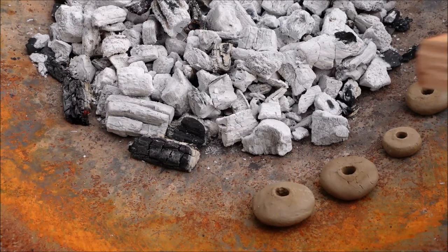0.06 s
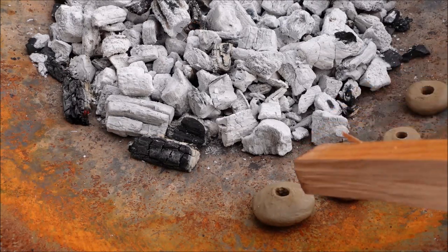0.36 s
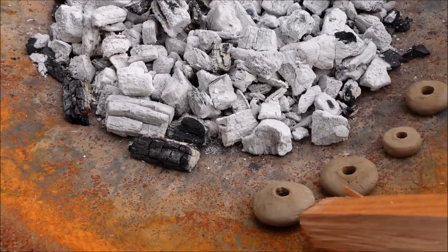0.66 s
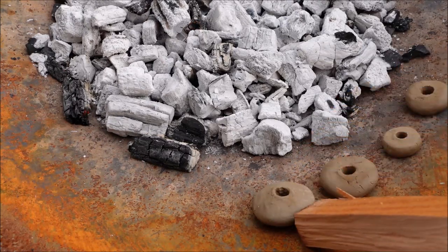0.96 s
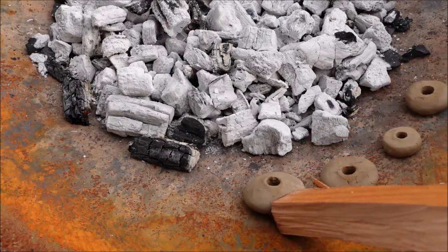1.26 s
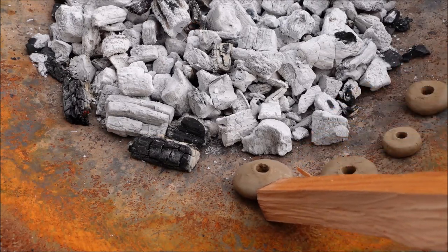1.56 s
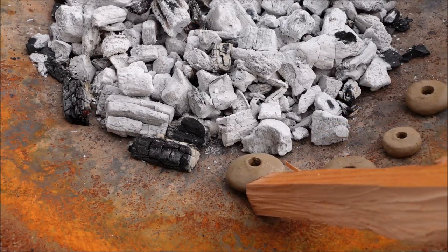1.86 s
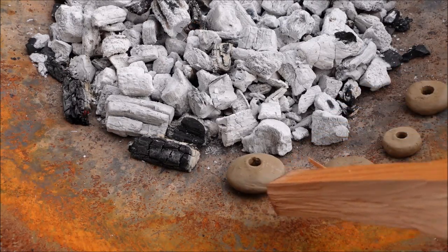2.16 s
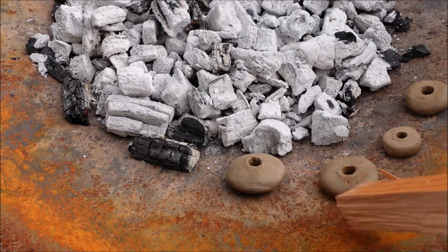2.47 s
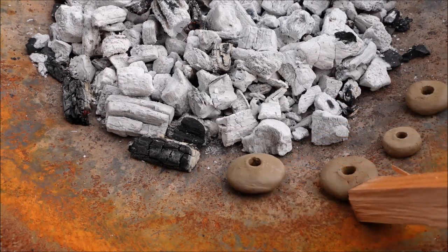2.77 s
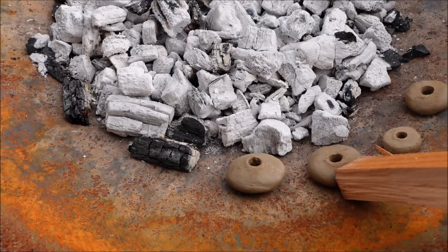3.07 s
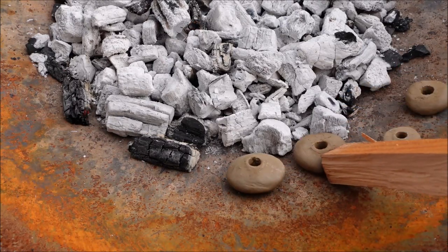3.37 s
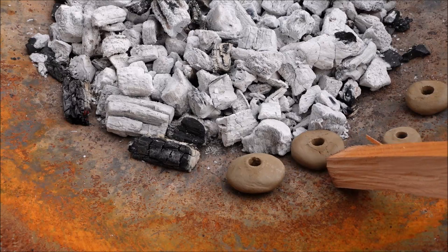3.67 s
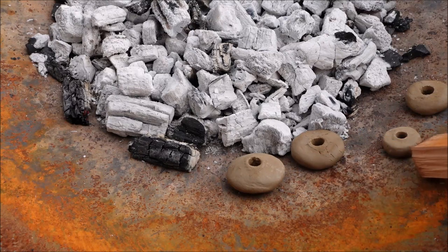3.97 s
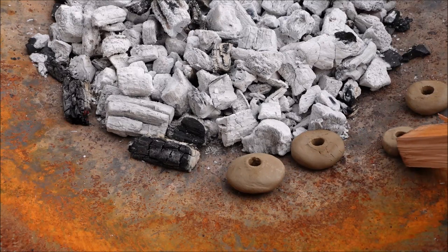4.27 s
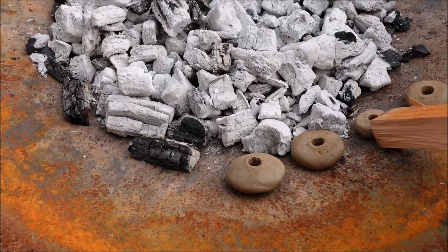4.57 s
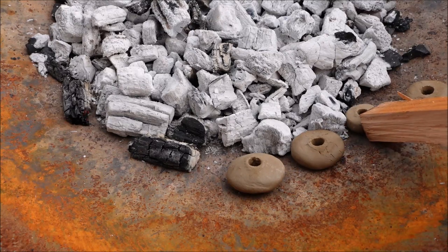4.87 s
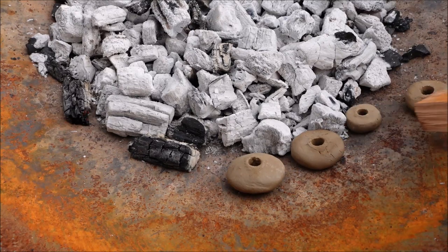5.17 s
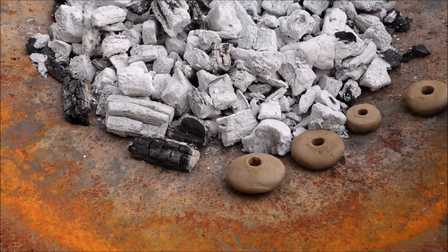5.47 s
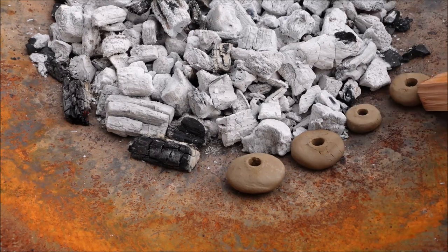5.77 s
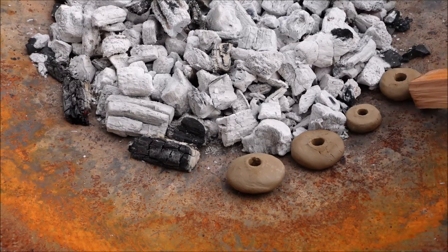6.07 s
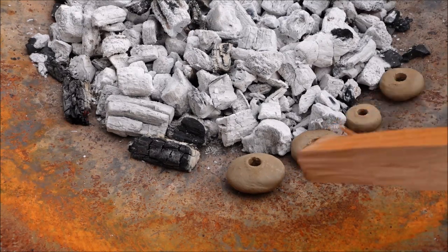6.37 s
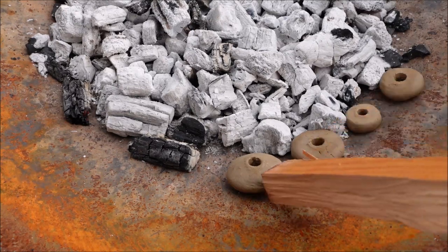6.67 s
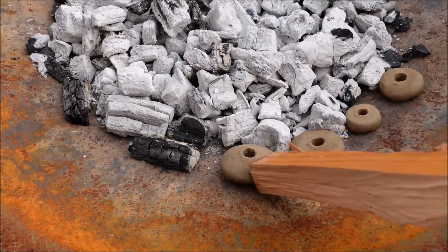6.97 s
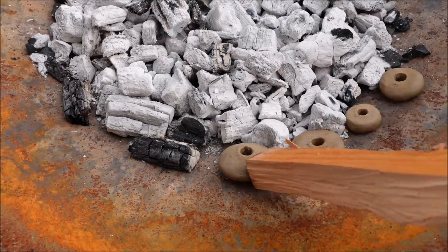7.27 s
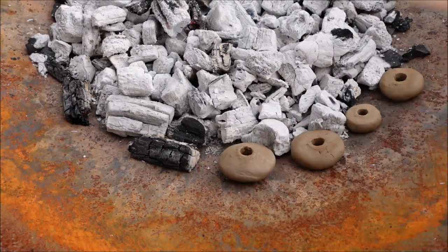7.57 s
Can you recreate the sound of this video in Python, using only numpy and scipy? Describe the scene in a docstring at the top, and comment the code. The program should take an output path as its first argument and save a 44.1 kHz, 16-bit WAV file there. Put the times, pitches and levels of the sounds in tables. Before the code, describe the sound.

Clay beads scrape and chatter over rusty steel five times, nudged by a stick, with soft thuds and faint charcoal ticks.

```python
"""Five gritty scrapes, with knocks and one short squeal, sound from a steel fire bowl outdoors.
A wooden stick thuds onto a clay bead and rubs until it breaks loose. The bead then chatters across
the rusty steel and grinds rust grit, and the bowl rings under it.
Charcoal ticks, the air rushes softly, and a far engine swells and fades."""
import sys
import numpy as np
from scipy import signal
from scipy.fft import rfft, irfft, next_fast_len
from scipy.io import wavfile
from scipy.ndimage import uniform_filter1d

SR = 44100
rng = np.random.default_rng(int(sys.argv[2]) if len(sys.argv) > 2 else 0)


def to_wav(sig):
    """Store sig (one row per channel, or 1-D mono) as 16-bit WAV at the path in sys.argv[1].

    Samples outside -1..1 are clipped; the rate is SR.
    """
    pcm = np.clip(np.atleast_2d(sig), -1, 1) * 32767
    pcm = np.round(pcm).astype(np.int16)
    wavfile.write(sys.argv[1], SR, pcm.T)  # frames by channels


N = 340679

# The bowl's modes, the tones it rings at. Each row: pitch in Hz, relative level in dB.
BOWL_MODES = [(1062, 3), (1118, 2), (1178, -2), (1254, 14), (1318, 3), (1389, 4), (1467, 10), (1569, 9.5),
              (1688, 4), (1908, 7), (1981, 8), (2167, 8), (2320, 5), (2503, 4), (2737, 10), (2972, 8),
              (3203, 9), (3437, 4), (3784, 5), (3943, 5), (4070, 11), (4212, 6), (4355, 8), (4673, 8),
              (4861, 5), (4974, 9), (5329, 12), (5682, 5), (6024, 7), (6409, 5)]
# The stick lands on a bead. Each row: start in seconds, level in dB, relative scuff level in dB.
THUDS = [(0.758, -32, -10.5), (0.967, -43, -5), (1.137, -39, 3), (2.648, -32, -4.5), (2.748, -34, -9),
         (4.052, -34, 1), (4.293, -44, -3), (5.451, -46, 6), (6.826, -39.5, 7)]


def strokes(modes, chatter_db=-5, grit_db=-3.5, rumble_db=-2, slip_db=-3, easing_db_per_s=2.5):
    """The stick pushes five beads; its effort drives chatter, grit and rumble, and the bowl rings."""
    # Each row: start, fastest moment and stop in seconds; then, in dB, relative level, rise before the
    # fastest moment, sag after it, extra chatter, extra rumble.
    pushes = [(1.131, 1.5, 1.953, -37, 7.5, 13.5, 0.1, -5), (2.904, 3.284, 3.58, -37, 5, 9, 1.2, -6.5),
              (4.321, 4.614, 4.889, -39, 4, 10.5, 4, -6.5), (5.662, 5.702, 6.018, -37, 2, 5.5, 4, -10),
              (6.836, 6.863, 7.194, -36.5, 10, 14, 5.5, -4)]
    # How each bead meets the steel. Each row: chatter pitch and width in Hz, gain of the strongest
    # bowl mode in dB, grit pitch in Hz, gain at that pitch in dB, dust gain in dB.
    contacts = [(1169, 137, -4, 2000, -6.5, 1.5), (1130, 51, -9, 5870, -4, 0),
                (1141, 100, -7.5, 4270, -7, -1), (1094, 80, -6.5, 4200, -4, 1.5),
                (1234, 370, -8, 4200, -10, 3)]
    # A caught bead jumps free. Each row: start in seconds, relative level in dB.
    slips = [(1.761, -28), (1.776, -22), (2.9618, -37), (2.9937, -41), (4.4207, -25), (4.5590, -23.5),
             (5.9557, -28), (6.9057, -23.5)]
    out, t = np.zeros((2, N)), np.arange(N) / SR
    rough = catches()
    for row, contact in zip(pushes, contacts):
        start, fastest, stop, db, rise_db, sag_db, extra_chatter_db, extra_rumble_db = row
        hz, width_hz, strongest_db = contact[:3]
        pace = effort(start, fastest, stop, rise_db, sag_db)
        chatter_gain, grit_gain, rumble_gain = undb(db) * pace * rough
        chatter_gain *= undb(chatter_db + extra_chatter_db)
        grit_gain *= undb(grit_db)
        easing_db = -easing_db_per_s * (t - fastest)  # the hand eases off
        rumble_gain *= undb(rumble_db + extra_rumble_db + easing_db)
        force, rumble = scrape(chatter_gain, grit_gain, rumble_gain, contact, pace)
        for s, jump_db in slips:
            if start <= s <= stop:
                jump = resonate(pulse(0.00048), hz, width_hz=380)
                add(force, s, chatter(jump, hz, width_hz), jump_db + slip_db)
        out += bowl(force, modes, strongest_db) + rumble
    return out


def effort(start, fastest, stop, rise_db, sag_db, attack_s=0.0025, stop_db_per_s=281):
    """Loudness of one push: the bead breaks loose, speeds up, slows and comes to rest."""
    t = np.arange(N) / SR
    before = np.clip((fastest - t) / max(fastest - start, attack_s), 0, 1)
    after = np.clip((t - fastest) / (stop - fastest), 0, 1)
    db = -rise_db * before ** 2 - sag_db * after ** 1.17  # a power above 1 holds the speed a while
    db -= stop_db_per_s * np.maximum(t - stop, 0)
    return np.clip((t - start) / attack_s, 0, 1) * undb(db) * (t < stop + .5)


def catches():
    """The bead catches on rough patches, which changes how loud chatter, grit and rumble are."""
    # Each row: middle and half length in seconds, then change of chatter, grit and rumble in dB.
    patches = [(1.779, 0.019, 16, 9, 13), (1.858, 0.035, 16.5, 4, 18), (1.899, 0.015, 6, 12.5, 10),
               (2.983, 0.025, 9, 3, 6), (3.121, .025, 5.5, 0.5, 4.5), (3.215, 0.01, 5, 0.5, -4),
               (3.396, 0.013, 7, 2, -2), (3.573, 0.0071, 8.5, 1, 3), (4.42, 0.021, 4.5, 5.5, 1),
               (4.561, 0.027, 8, 0, 2), (4.814, 0.043, 6.5, 7.5, -6), (5.962, 0.026, 2, 5.5, -5),
               (6.855, 0.016, -1.5, 3.5, 2.5), (6.902, 0.017, 5, -8, -7)]
    db, t = np.zeros((3, N)), np.arange(N) / SR
    for middle, half_s, *change_db in patches:
        bump = np.exp(-np.minimum(((t - middle) / half_s) ** 2, 20))
        db += np.outer(change_db, bump)
    return undb(db)


def scrape(chatter_gain, grit_gain, rumble_gain, contact, pace=1, uneven_db=1.62):
    """Tiny slips shake bead and stick while rust crunches; gives the force on the bowl and a rumble."""
    # Tone of the fine dust and of the stick. Each row: frequency in Hz, level in dB.
    dust_tone = [(6000, -22), (8000, 3), (10500, 2)]
    stick_tone = [(40, -42), (110, -10), (160, -3), (250, 5), (310, -10), (400, -15.5), (600, -18),
                  (900, -24), (2500, -76)]
    hz, width_hz, _, grit_hz, peak_db, dust_db = contact
    slips = grains(rate=1400, spread_db=1.14)
    grit = crunch(grit_hz, peak_db)
    dust_gain = undb(dust_db) * pace ** 0.3  # a fast bead sounds brighter
    grit = grit + colour(grit, dust_tone) * (dust_gain - 1)
    force = unit(chatter(slips, hz, width_hz)) * chatter_gain + grit * grit_gain
    force *= undb(uneven_db * wander(70))  # the grip varies with the rust underneath
    return force, unit(colour(slips, stick_tone)) * rumble_gain


def chatter(force, hz, width_hz, edge_hz=1065):
    """The bead bounces on its stiff contact; the steel gives off little sound below edge_hz."""
    low_cut = signal.butter(8, edge_hz, "high", fs=SR, output="sos")
    return signal.sosfilt(low_cut, resonate(force, hz, width_hz))


def crunch(pitch_hz, peak_db, echo_db=-8, echo_samples=400):
    """Rust grains break under the clay; each crack echoes in the bead for a few milliseconds."""
    # Tone of the grit. Each row: frequency in Hz, level in dB.
    grit_tone = [(300, -36), (900, -5), (1500, 5.5), (2100, 4.5), (2400, 4), (3300, 3.5), (5000, -1),
                 (7500, 2), (9000, -4.5), (12500, -10.5), (16000, -17)]
    cracks = colour(grains(rate=4000, spread_db=0), grit_tone)
    echo = rng.standard_normal(echo_samples) * np.linspace(1, 0, echo_samples) ** 2
    cracks = cracks + undb(echo_db) * signal.oaconvolve(cracks, echo / np.linalg.norm(echo))[:N]
    return unit(cracks + undb(peak_db) * resonate(cracks, pitch_hz, width_hz=490))


def bowl_modes(ring_db=4, t60_s=0.22, fine_count=130, fine_db=3, fine_t60_s=0.45):
    """The steel rings at its main modes and many weak high ones; t60 is the time to fade by 60 dB."""
    t = np.arange(SR // 2) / SR
    main_hz, main_db = np.transpose(BOWL_MODES)
    hz = np.r_[main_hz, rng.uniform(3000, 14000, fine_count)]
    db = np.r_[main_db + ring_db, np.full(fine_count, fine_db)]
    decay = np.log(1000) / np.r_[np.full(len(main_hz), t60_s), np.full(fine_count, fine_t60_s)]
    gain = undb(db) * 2 * decay / SR
    return hz, gain[:, None] * np.exp(-np.outer(decay, t)) * np.cos(2 * np.pi * np.outer(hz, t))


def bowl(force, modes, strongest_db, spread=0.33, hop=8192):
    """The contact's own sound plus the ringing steel; each new spot on the bowl favours other modes."""
    hz, rings = modes
    strongest = np.argmax(np.array(BOWL_MODES)[:, 1])
    fineness = np.minimum(hz / 4000, 1)  # high modes vary most with spot and direction
    ears = widen(0.82, spread * fineness * rng.choice([-1, 1], len(hz)))
    out = widen(force, 0)
    for i in range(0, N - 2 * hop, hop):
        spot = force[i:i + 2 * hop] * np.hanning(2 * hop)
        db = 2.5 * fineness * rng.standard_normal(len(hz)).clip(-2, 2)
        db[strongest] = strongest_db
        if spot.any():
            response = (undb(db) * ears) @ rings
            ring = signal.fftconvolve(spot[None], response, axes=1)[:, :N - i]
            out[:, i:i + ring.shape[1]] += ring
    return out


def knocks(modes, scuff_db=-3, scuff_s=0.0095, clack_db=2):
    """Wood thuds softly on clay with a scuff of grit, and rocking beads clack hard on the steel."""
    # Each row: start of a clack in seconds, relative level in dB.
    clacks = [(1.138, -40), (1.773, -27), (1.882, -27), (2.9029, -21.5), (4.05, -45), (4.324, -20),
              (4.4035, -22), (4.4542, -23), (4.492, -34), (4.5414, -24), (5.6659, -26), (5.8674, -28.5),
              (6.8256, -39), (6.9063, -24)]
    # Modes of stick on bead and of bead on steel. Each row: pitch in Hz, width in Hz, gain in dB.
    thud_modes = [(155, 18, -2), (226, 74, -4.5), (470, 190, -12)]
    clack_modes = [(1240, 130, 9.5), (2090, 61, 16.5), (2470, 330, 6), (3400, 570, 1), (4300, 210, -23)]
    force, t = np.zeros(N), np.arange(SR // 5) / SR
    soft_hit = resonate(pulse(0.00096), hz=236, width_hz=118)
    thud = sum(undb(db) * resonate(soft_hit, hz, width) for hz, width, db in thud_modes)
    for s, db, extra_db in THUDS:
        add(force, s, thud, db)
        scuff = rng.standard_normal(len(t)) * np.exp(-t / scuff_s)
        add(force, s, chatter(scuff, hz=960, width_hz=510), db + extra_db + scuff_db)
    hard_hit = np.gradient(pulse(0.00041))
    clack = sum(undb(db) * resonate(hard_hit, hz, width) for hz, width, db in clack_modes)
    for s, db in clacks:
        add(force, s, clack, db + clack_db)
    return bowl(force, modes, strongest_db=-5)


def squeal(hz=1243, db=-26, rough_db=1, jitter=0.0202):
    """The first bead grips and slips in step with the strongest bowl mode: a rough, wavering tone."""
    phase = 2 * np.pi * hz * np.cumsum(1 + jitter * wander(300)) / SR
    tone = unit(np.sin(phase) * undb(rough_db * wander(220)))
    shape = held(start_s=1.755, length_s=0.115, sag_db=6, attack_s=0.0055, release_s=0.0076)
    return tone * undb(db) * shape


def touches(modes, chatter_db=-5, grit_db=-2, rumble_db=-2):
    """The stick rubs lightly on a bead that stays put."""
    # Each row: start and length in seconds, then relative levels of chatter, grit and rumble in dB.
    rubs = [(0.759, 0.19, -76, -63.5, -46), (0.951, 0.072, -76, -67, -46), (0.976, 0.14, -66, -54.5, -56),
            (1.096, 0.02, -53, -50, -53), (2.746, 0.055, -56.5, -57.5, -44),
            (2.817, 0.14, -47.5, -51.5, -46.5), (3.644, 0.027, -51, -54.5, -69),
            (4.061, 0.15, -52.5, -60, -50), (4.295, 0.041, -45.5, -61, -43),
            (5.446, .09, -53.5, -53, -48.5), (5.603, 0.062, -53.5, -50.5, -57),
            (7.223, 0.029, -56, -54.5, -75)]
    # How wood meets clay: one row with the same columns as the contacts in strokes().
    wood_contact = (1398, 300, -7, 4600, -9, -2.5)
    gains = np.zeros((3, N))
    for s, length_s, *db in rubs:
        gains += np.outer(undb(db), held(s, length_s, sag_db=2, attack_s=0.0096, release_s=0.022))
    chatter_gain, grit_gain, rumble_gain = gains
    force, rumble = scrape(chatter_gain * undb(chatter_db), grit_gain * undb(grit_db),
                           rumble_gain * undb(rumble_db), wood_contact)
    touching = grit_gain > 1e-6
    return bowl(force * touching, modes, strongest_db=wood_contact[2]) + rumble


def long_tones():
    """The stick's first thud also meets the steel and leaves the whole bowl singing."""
    # Each row: pitch in Hz, level in dB, seconds to fade by 60 dB.
    tones = [(86.3, -52, 1.2), (166, -44.5, 0.57), (434, -79, 1.2), (530, -62.5, 11.4), (836, -65, 4),
             (1087, -61, 10), (2520, -59, 1)]
    t = np.maximum(np.arange(N) / SR - THUDS[0][0], 0)
    return sum(undb(db - 60 * t / t60) * np.sin(2 * np.pi * hz * t) for hz, db, t60 in tones)


def ticks(crack_s=0.0017, tail_s=0.012, tail_db=-20):
    """Charcoal and grit crack, and each crumb rings briefly at its own pitch."""
    # Each row: start in seconds, level in dB, pitch in Hz.
    cracks = [(0.4179, -56, 5640), (0.615, -54, 9580), (0.6739, -52, 9550), (0.6838, -58, 4010),
              (1.4922, -24.5, 6200), (1.9688, -36.5, 5640), (2.5915, -48, 7300), (3.691, -36.5, 9300),
              (4.7645, -40, 4100), (4.814, -17.5, 7680), (6.6375, -48, 4440), (7.632, -36.5, 9960),
              (7.7007, -41, 6270)]
    # A crumb's modes. Each row: multiple of its pitch, gain in dB.
    crumb_modes = [(.6, -2.5), (1, 3), (1.5, -6)]
    out, t = np.zeros(N), np.arange(SR // 20) / SR
    fade = np.exp(-t / crack_s) + undb(tail_db) * np.exp(-t / tail_s)
    for s, db, hz in cracks:
        crack = rng.standard_normal(len(t)) * fade
        clink = sum(undb(gain) * resonate(crack, hz * ratio, 450) for ratio, gain in crumb_modes)
        add(out, s, clink, db)
    return out


def rustles(length_s=0.024, width_hz=2500):
    """Fine dry grains rustle in brief, faint swells."""
    # Each row: middle in seconds, level in dB, pitch in Hz.
    swells = [(0.025, -55.5, 5200), (7.724, -52, 3630)]
    out, t = np.zeros(N), np.arange(N) / SR
    crackle = grains(rate=3000, spread_db=1)
    for middle, db, hz in swells:
        rustle = unit(resonate(resonate(crackle, hz, width_hz), hz, width_hz))
        out += rustle * undb(db) * np.exp(-((t - middle) / length_s) ** 2)
    return out


def far_engine(octave_db=-9, side_db=-19.5):
    """A far engine hums at its firing rate and roars as it slowly gathers speed."""
    # Each row: time in seconds, firing rate in Hz, hum level in dB, roar level in dB.
    course = [(0, 111.5, -70, -65), (3.75, 113.7, -75, -53), (3.862, 117, -54.5, -57),
              (4.5, 120, -60, -49.5), (4.8, 125, -52.5, -46.5), (5.4, 131, -49, -49), (5.8, 131, -71, -48),
              (6.4, 130, -84, -59), (7.73, 130.6, -62, -59.5)]
    # Tone of the roar. Each row: frequency in Hz, level in dB.
    roar_tone = [(40, -36), (90, -8), (130, 0.5), (175, -2.5), (228, 2), (330, -3), (420, -21.5),
                 (750, -33.5), (1000, -15), (1800, -22), (4000, -42)]
    s, hz, hum_db, roar_db = np.transpose(course)
    firing_hz = np.interp(np.arange(N) / SR, s, hz) * (1 + 0.0089 * wander(11))
    phase = 2 * np.pi * np.cumsum(firing_hz) / SR
    hum = unit(np.sin(phase) + undb(octave_db) * np.sin(2 * phase)) * undb(2 * wander(9))
    roar = widen(noise(roar_tone), undb(side_db) * noise(roar_tone))
    return hum * swell(s, hum_db) + roar * swell(s, roar_db)


def outdoor_air(db=-58.5):
    """A soft, wide rush of air whose level wavers slightly."""
    # Tone of the air. Each row: frequency in Hz, level in dB.
    air_tone = [(15, -51), (25, -36), (53, -0.5), (263, 3), (301, -9), (354, -3), (516, -8.5), (714, -4.5),
                (863, -5.5), (1130, -4.5), (2110, -10), (3160, -15.5), (6050, -21), (14400, -25),
                (16000, -37)]
    # Its stereo width. Each row: frequency in Hz, side level over mid level in dB.
    air_width = [(60, -18), (200, -6.5), (700, -4), (1300, -5.5), (4400, -3.5), (15000, -11.5)]
    mid, side = noise(air_tone), colour(noise(air_tone), air_width)
    return widen(mid, side) * undb(db + 0.29 * wander(5))


def undb(db):
    """Turn decibels into a gain."""
    return 10 ** (np.asarray(db) / 20)


def unit(x):
    """Scale to an average (rms) level of 1."""
    return x / np.sqrt(np.mean(x ** 2))


def swell(s, db):
    """Loudness curve through points in seconds and dB, silent outside them."""
    t = np.arange(N) / SR
    gate = np.interp(t, [s[0] - .004, s[0], s[-1], s[-1] + .012], [0, 1, 1, 0])
    return gate * undb(np.interp(t, s, db))


def held(start_s, length_s, sag_db, attack_s, release_s):
    """Loudness curve that rises, sags while it is held, then dies away."""
    t = np.arange(N) / SR - start_s
    rise = np.clip(t / attack_s, 0, 1)
    sag = undb(-sag_db * np.clip(t / length_s, 0, 1))
    return rise * sag * np.exp(-np.maximum(t - length_s, 0) / release_s)


def colour(x, points):
    """Shape a sound's tone with a curve through points in Hz and dB."""
    hz, db = np.transpose(points)
    size = next_fast_len(len(x))
    f = np.maximum(np.fft.rfftfreq(size, 1 / SR), 1)
    gain = undb(np.interp(np.log(f), np.log(hz), db))
    return irfft(rfft(x, size) * gain, size)[:len(x)]


def noise(tone):
    """Steady noise with the given tone."""
    return unit(colour(rng.standard_normal(N), tone))


def resonate(x, hz, width_hz):
    """Let a sound ring in one band around hz."""
    return signal.lfilter(*signal.iirpeak(min(hz, SR / 2 - 1000), hz / width_hz, fs=SR), x)


def wander(rate):
    """Smooth random drift of size near 1, with rate new values a second."""
    size = int(SR / rate)
    steps = np.repeat(rng.standard_normal(N // size + 1), size)
    return unit(uniform_filter1d(steps, size))[:N]


def grains(rate, spread_db):
    """Tiny random hits, about rate a second; spread_db makes a few of them stronger."""
    size = undb(spread_db * np.minimum(rng.exponential(size=N), 4))
    return unit((rng.random(N) < rate / SR) * size * rng.choice([-1, 1], N))


def pulse(length_s):
    """The smooth bump of force from one hit, then silence."""
    t = np.arange(SR // 5) / SR
    return np.sin(np.pi * np.minimum(t / length_s, 1)) ** 2


def add(track, s, sound, db):
    """Mix a short sound in at s seconds with its peak at db."""
    i = int(s * SR)
    track[i:i + len(sound)] += (undb(db) * sound / np.abs(sound).max())[:N - i]


def widen(mid, side):
    """Make left and right from what they share (mid) and what sets them apart (side)."""
    return np.array([mid + side, mid - side])


def scene(pan_db=-0.83):
    """The beads in the bowl, slightly to the right, over the quiet outdoor sounds."""
    modes = bowl_modes()
    beads = strokes(modes) + touches(modes) + knocks(modes) + squeal()
    beads *= undb([[pan_db / 2], [-pan_db / 2]])
    return beads + long_tones() + ticks() + rustles() + far_engine() + outdoor_air()


def record(dry, top_hz=16000):
    """The microphone cuts off the sound above top_hz."""
    return signal.sosfilt(signal.ellip(10, .2, 80, top_hz, fs=SR, output="sos"), dry)


dry = scene()
out = record(dry)
to_wav(out)
```